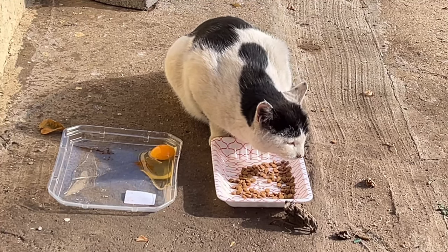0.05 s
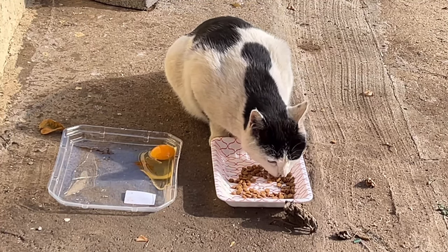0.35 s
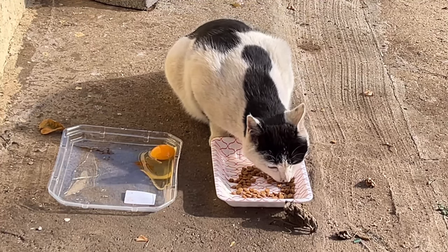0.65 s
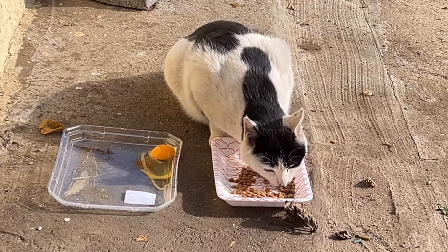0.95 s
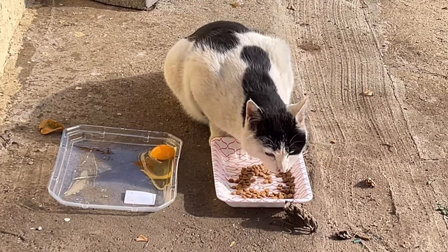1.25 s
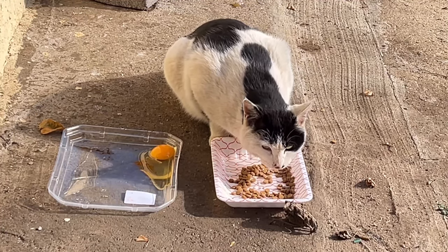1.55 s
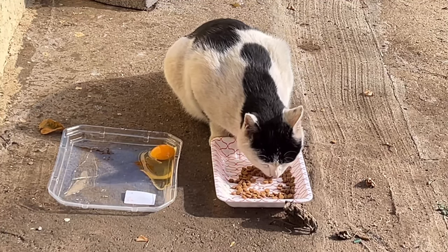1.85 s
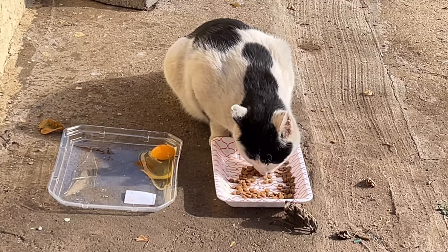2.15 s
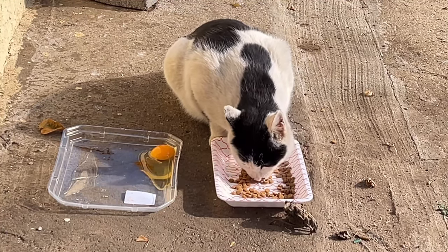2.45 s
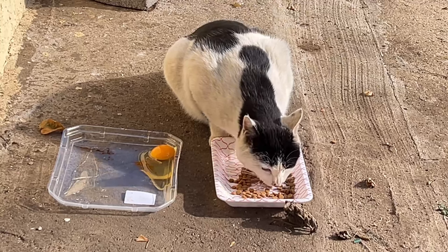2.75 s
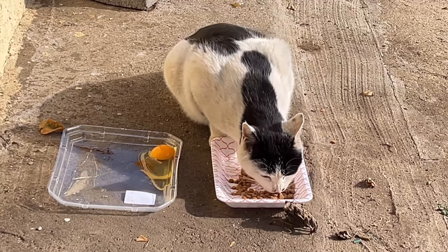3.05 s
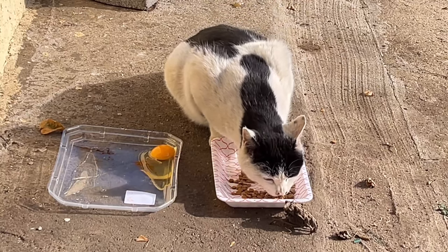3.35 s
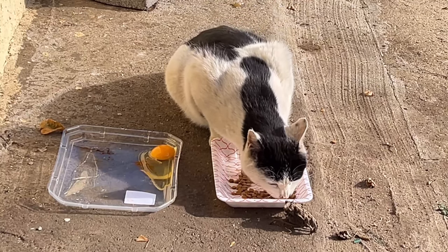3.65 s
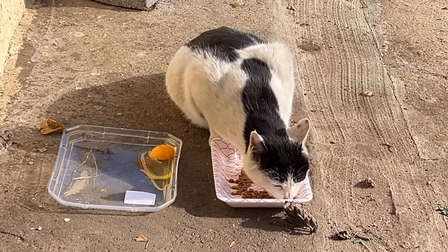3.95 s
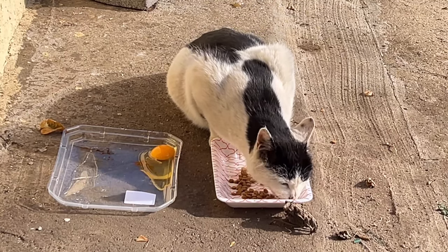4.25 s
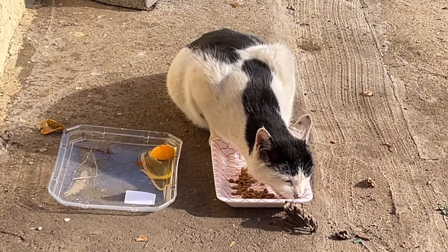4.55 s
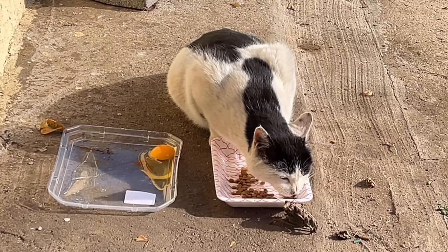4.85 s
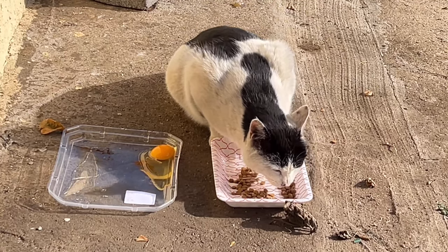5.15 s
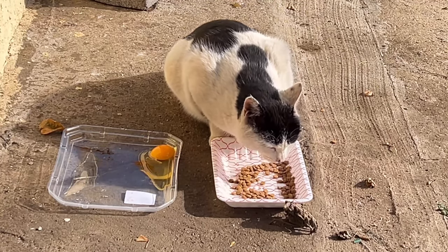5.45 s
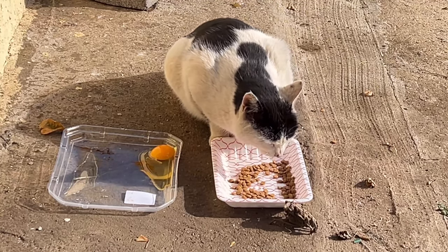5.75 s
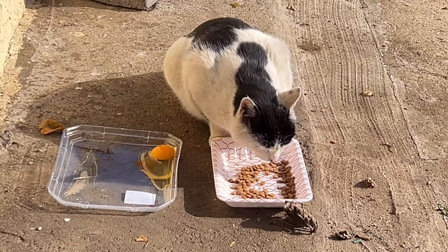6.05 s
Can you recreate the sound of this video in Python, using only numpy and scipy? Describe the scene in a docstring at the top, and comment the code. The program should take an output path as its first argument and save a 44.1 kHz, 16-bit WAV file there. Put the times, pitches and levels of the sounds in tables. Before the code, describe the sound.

A shoe scuffs on grit and wind bumps the microphone, then a cat quietly crunches dry food outdoors.

```python
"""A shoe scuffs on gritty concrete close by, clothing swishes and puffs of air bump the microphone.
Then a cat eats dry kibble from a foam tray in the quiet yard: pellets crack and crumble between its
teeth, and its tongue and lips smack. Early on a small bird whistles far off; distant traffic hums
under it all."""
import sys
import numpy as np
from scipy import signal
from scipy.fft import rfft, irfft, next_fast_len
from scipy.io import wavfile
from scipy.ndimage import uniform_filter1d, map_coordinates

SR = 44100
rng = np.random.default_rng(int(sys.argv[2]) if len(sys.argv) > 2 else 0)


def transcribe(signal):
    """Save signal, clipped to [-1, 1], as a 16-bit WAV file at the path in sys.argv[1]."""
    frames = np.atleast_2d(signal).T
    limited = np.clip(frames, -1, 1)
    pcm = np.round(limited * 32767).astype(np.int16)
    wavfile.write(sys.argv[1], SR, pcm)


N = 277999

# pellets cracking and ticking on the tray: start_s, level_db, pitch_hz, treble_db
BITES = [(1.953, -66, 6740, 20.5), (2.028, -48.5, 2860, -5), (2.297, -53, 1840, 3), (2.401, -43, 1800, 3.5),
         (2.41, -47.5, 4500, -16.5), (2.431, -39, 2940, -1), (2.447, -42, 2710, -34), (2.653, -57, 4480, 7),
         (2.663, -37, 4520, -5.5), (2.759, -47.5, 2730, -2), (2.781, -48, 2840, -6),
         (2.891, -43.5, 4400, -3), (2.902, -51, 4330, -7), (3.018, -50.5, 2740, 2), (3.032, -47.5, 2780, 2),
         (3.085, -49, 2900, 4), (3.175, -50, 2800, 2.5), (3.293, -53.5, 2580, -28),
         (3.327, -33, 2940, -16.5), (3.438, -52, 1810, -2), (3.568, -39.5, 2755, -8),
         (3.579, -48, 1860, -15), (3.739, -53, 2700, -21), (3.877, -66, 2690, 11), (4.041, -53.5, 2590, -2),
         (4.133, -49.5, 2600, -31), (4.156, -48, 2650, -19), (4.171, -45.5, 2670, -19),
         (4.272, -56.5, 1520, 2.5), (4.31, -52, 2620, -14), (4.382, -52.5, 2630, -4),
         (4.404, -52, 2750, -21), (4.421, -55.5, 2730, -18), (4.71, -38, 2050, -5.5),
         (4.713, -42.5, 1030, -18), (4.813, -56.5, 1550, -27), (5.054, -53, 2720, -31),
         (5.751, -44, 2600, 3.5)]
# jaw strokes that grind the crumbs: start_s, hold_s, level_db
CHEWS = [(2.01, 0.2, -76.5), (2.33, 0.13, -66.5), (2.635, 0.026, -58), (2.775, 0.02, -57.5),
         (2.905, 0.0055, -56), (3.05, 0.027, -61.5), (3.175, 0.016, -72.5), (3.39, .13, -67.5),
         (3.575, 0.02, -61), (3.745, 0.02, -64.5), (3.875, 0.02, -64), (4.0, 0.33, -77)]
# tone of the crumbs, and a bite's bright edge: frequency_hz, gain_db
CRUMB_EQ = [(800, -30), (1550, 4.5), (2150, -3), (2850, 1), (3700, -10), (4500, -4.5), (5300, -9),
            (7300, -10), (10000, -13.5), (15000, -23.5)]
SPLINTER_EQ = [(2500, -3.5), (4500, -5.5), (5000, -6.5), (6400, 1), (8800, -6.5), (15000, -13)]
# wet smacks of tongue and lips: start_s, hold_s, level_db, mouth_hz, lip_gain_db
SMACKS = [(4.565, 0.018, -64.5, 2540, -5.5), (4.643, 0.028, -65.5, 2750, -8.5),
          (4.959, 0.025, -71, 1900, 0), (5.354, 0.015, -64.5, 1920, -4.5),
          (5.655, 0.0028, -68.5, 2200, 10.5), (6.243, 0.018, -73.5, 2620, -23)]
# drags of the sole and swishes of a sleeve: start_s, hold_s, grind_db, hiss_db
SCUFFS = [(0.01, 0.12, -59, -57.5), (0.34, 0.066, -62.5, -58), (0.599, 0.031, -53.5, -63.5),
          (0.668, 0.02, -54, -68), (0.726, 0.042, -45, -63), (0.799, 0.064, -46, -55),
          (0.885, 0.16, -77, -56.5), (1.08, 0.013, -82, -67), (1.372, 0.0077, -60.5, -67.5),
          (1.494, 0.047, -73, -74.5), (1.745, 0.068, -75, -75.5), (1.93, 0.16, -65.5, -76),
          (6.084, 0.079, -77.5, -73)]
# grit snapping underfoot: start_s, level_db, pitch_hz, treble_db
GRIT = [(0.018, -44, 2030, 7), (0.205, -43, 2780, -27), (0.251, -39.5, 1530, -17), (0.597, -36, 1720, -30),
        (0.677, -47.5, 1880, -21), (0.746, -31, 1840, -22), (0.77, -29.5, 1850, -22),
        (0.795, -33.5, 2420, -5.5), (0.816, -33, 2650, -16), (0.835, -36.5, 2060, 1),
        (0.857, -35.5, 2170, 1), (0.943, -37, 1480, -9), (0.98, -41.5, 1900, -23), (1.097, -31.5, 1820, -8),
        (1.101, -26.5, 1450, -3), (1.185, -38, 1970, -58), (1.377, -38.5, 2140, -7),
        (1.381, -42.5, 2110, -20)]
# tone of grinding sand, and of sliding sand and fabric: frequency_hz, gain_db
GRIND_EQ = [(260, -51.5), (470, -15), (650, -0.5), (760, -3), (1050, 0), (1230, -7), (1700, -4), (2650, -8),
            (3150, -13), (3580, -14.5), (4100, -17.5), (6000, -27), (13000, -53)]
HISS_EQ = [(2000, 1), (5700, -1), (6600, 3.5), (7500, 1.5), (8400, 3.5), (9400, 2.5), (11000, 3),
           (15500, -8.5)]
# dull knocks of the sole landing: start_s, level_db
STEPS = [(1.099, -35.5), (1.381, -40)]
# gusts on the microphone: start_s, hold_s, buffet_db, flutter_db
GUSTS = [(0.1, 0.056, -40, -41), (0.195, 0.057, -38.5, -41.5), (0.323, 0.055, -38.5, -39.5),
         (0.42, 0.031, -34, -38.5), (0.585, 0.032, -36, -36.5), (.63, 0.035, -39.5, -49),
         (0.768, 0.2, -43.5, -43.5), (1.019, 0.11, -39.5, -49), (1.291, 0.12, -41.5, -56.5),
         (1.5, 0.1, -46.5, -62), (3.8, 0.15, -55, -65), (4.15, 0.19, -51, -76), (4.532, 0.23, -39, -65.5),
         (4.761, 0.73, -52, -74), (5.625, 0.13, -33, -61)]
# single puffs: peak_s, level_db, pitch_hz
PUFFS = [(0.091, -25, 99), (0.124, -20, 69), (0.115, -25.5, 248), (0.153, -23.5, 196), (0.189, -29.5, 294),
         (0.236, -27, 156), (0.34, -24, 100), (0.35, -38, 240), (0.386, -32, 113), (0.42, -22.5, 236),
         (0.432, -27, 163), (0.445, -24, 123), (.586, -23.5, 350), (0.591, -19.5, 120), (0.599, -23.5, 173),
         (.636, -32, 149), (1.028, -32.5, 130), (1.054, -37, 85), (1.319, -33, 65.5), (1.385, -29.5, 123),
         (1.531, -36, 81), (3.935, -38, 80), (4.141, -35.5, 64), (4.544, -30, 67), (4.647, -34, 177),
         (4.658, -27.5, 67), (4.975, -25.5, 71), (5.022, -23.5, 67), (5.073, -34.5, 59.5), (5.353, -32, 80),
         (5.465, -30.5, 67.7), (5.557, -18, 112), (5.573, -22.5, 217), (5.58, -15, 95), (5.643, -20, 119),
         (5.69, -26, 136), (5.739, -24, 93.6), (5.765, -23.5, 101)]
# tone of the deep buffet, and of the small, fast eddies: frequency_hz, gain_db
BUFFET_EQ = [(25, -15), (52, 4.5), (70, 9), (110, -3), (160, -15), (400, -71.5)]
FLUTTER_EQ = [(70, -26), (130, 5), (240, 3.5), (380, -3), (550, -14.5), (680, -22), (900, -24), (2000, -69)]
# bird calls: start_s, length_s, from_hz, to_hz, level_db
CHIRPS = [(.255, .07, 4490, 4400, -72.5), (.425, .075, 4130, 4240, -73), (.66, .06, 4520, 4660, -73),
          (1.21, .05, 4900, 5250, -80), (1.672, .08, 4380, 5020, -78.5)]
# the traffic's fader: time_s, gain_db
TRAFFIC_FADER = [(0, -59.5), (2.2, -65.5), (2.8, -60.5), (3.5, -64.5), (6.3, -66.5)]
# drones in the traffic: pitch_hz, half_width_hz, gain_db
DRONES = [(178.4, 16.3, -3), (733, 13, -13), (1111, 37, -14.5)]
# tone of its murmur and its rumble: frequency_hz, gain_db
MURMUR_EQ = [(90, -22), (160, 4), (260, 1.5), (450, -2.5), (800, -8), (1200, -10), (1800, -12.5),
             (2600, -18), (3400, -26), (5600, -29), (7300, -25.5), (11000, -30.5), (15500, -27)]
RUMBLE_EQ = [(25, -15), (65, -1), (110, -8.5), (400, -60)]
# stereo spread overall, and of the scuffs: frequency_hz, side_minus_mid_db
WIDTH = [(60, -7), (300, -10.5), (800, -1), (2200, -24.5), (4400, -11), (6000, -48), (13000, -28)]
SHOE_WIDTH = [(400, 9), (800, 1), (1300, 5.5), (2400, -24), (4400, -9), (6000, -46)]
# the yard's reverb time: frequency_hz, t60_s
YARD_DECAY = [(300, 0.19), (2500, 0.19), (8000, 0.25), (15000, 0.22)]
# how far the right microphone port trails the left: frequency_hz, lag_rad
PORT_LAG = [(5000, 0), (8600, .5), (10400, 2.9), (11500, 3.3), (13600, 5.6)]

JAW_SLOPES, SCUFF_SLOPES, GUST_SLOPES = (691, 315), (363, 203), (494, 378)  # rise_db_per_s, fall_db_per_s


def cat():
    """Each bite snaps a pellet, and the jaw grinds the crumbs."""
    bites = snaps(BITES, CRUMB_EQ, SPLINTER_EQ, attack_s=0.00034, hard_db=-32, step_db=-13, tone=0.7,
                  body_db=-10, treble_db=-7.5, crumble_db=-22.5, crumble_t60_s=0.064, ring_db=5)
    cracks = crackle(per_s=700, spread_db=5, bed_db=-7)
    crumbs = swells(CHEWS, *JAW_SLOPES) * coloured(cracks, CRUMB_EQ)
    return stereo(walls(bites + crumbs, wet_db=-9), WIDTH)


def smacks():
    """Tongue and lips part and ring the mouth's two resonances."""
    track = np.zeros((2, N))
    for s, hold, db, mouth_hz, lip_db in SMACKS:
        mouth = rasp(hold, mouth_hz, q=2.05)
        lips = amp(lip_db) * rasp(hold, hz=6220, q=2.05)
        add(track, s, amp(db) * (mouth + lips))
    return stereo(walls(track, wet_db=-8), WIDTH)


def shoe():
    """A sole drags over sand: fine grains grind, and the coarse ones snap."""
    drag = swells([(s, hold, db) for s, hold, db, _ in SCUFFS], *SCUFF_SLOPES)
    sand = crackle(per_s=800, spread_db=4.5, bed_db=-7)
    grind = drag * coloured(sand, GRIND_EQ)
    grit = snaps(GRIT, GRIND_EQ, HISS_EQ, attack_s=0.00075, hard_db=-29, step_db=-8, tone=0.3,
                 body_db=-1.5, treble_db=-6, crumble_db=-19, crumble_t60_s=0.03, ring_db=-6)
    return stereo(walls(amp(3) * grit, wet_db=-6) + grind, SHOE_WIDTH)


def sole(knock_hz=624, t60_s=0.086):
    """The sole rasps over a trapped stone, and knocks when it is set down."""
    track, t = np.zeros((2, N)), np.arange(SR // 8) / SR
    add(track, 0.08, amp(-48) * rasp(hold_s=0.038, hz=2230, q=2.8))
    for s, db in STEPS:
        knock = np.sin(2 * np.pi * (knock_hz * t + rng.random((2, 1))))
        add(track, s, amp(db - 60 * t / t60_s) * knock)
    return stereo(track, WIDTH)


def swish():
    """Sand and fabric slide with a fine hiss."""
    slide = swells([(s, hold, db) for s, hold, _, db in SCUFFS], *SCUFF_SLOPES)
    hiss = coloured(crackle(per_s=2000, spread_db=4, bed_db=3), HISS_EQ)
    return stereo(slide * hiss, SHOE_WIDTH)


def wind(wobble_hz=30):
    """Gusts and a dying breeze rumble on the microphone, with hard puffs on top."""
    buffet = swells([(s, hold, db) for s, hold, db, _ in GUSTS], *GUST_SLOPES)
    flutter = swells([(s, hold, db) for s, hold, _, db in GUSTS], *GUST_SLOPES)
    breeze = amp(-41 - 10 * np.arange(N) / SR)
    air = np.hypot(buffet, breeze) * eddies(BUFFET_EQ)
    air += np.hypot(flutter, amp(-5.5) * breeze) * eddies(FLUTTER_EQ)
    thumps = puffs()
    lumps = rng.standard_normal(N * wobble_hz // SR + 4)
    wobble_db = 2.2 * map_coordinates(lumps, [np.arange(N) * wobble_hz / SR])
    return stereo(air * amp(wobble_db), WIDTH) + thumps


def eddies(eq):
    """Turbulent pressure, its level evened out over about 30 ms."""
    pressure = coloured(rng.standard_normal((2, N)), eq)
    power = np.abs(uniform_filter1d(pressure ** 2, 1300, axis=1))
    return pressure / np.sqrt(power + 0.00035)


def puffs():
    """A hard puff swings the pressure for a cycle or two."""
    track, t = np.zeros(N), np.arange(-SR // 20, SR // 20) / SR
    nepers_per_cycle = np.where(t < 0, 5.77, 1.88)  # fast attack, slower release
    for s, db, hz in PUFFS:
        swing = np.sin(2 * np.pi * (hz * t + rng.random()))
        add(track, s + t[0], amp(db) * swing / np.cosh(nepers_per_cycle * hz * t))
    return track


def bird():
    """Thin gliding whistles, blurred by distance."""
    song = np.zeros((2, N))
    for s, length, from_hz, to_hz, db in CHIRPS:
        hz = np.linspace(from_hz, to_hz, int(length * SR))
        quiver = 1 + 0.1 * rng.standard_normal(len(hz))
        whistle = np.sin(2 * np.pi * np.cumsum(hz * quiver) / SR)
        add(song, s, amp(db) * signal.windows.tukey(len(hz)) * whistle)
    return walls(song, wet_db=-4)


def traffic():
    """A bed of distant traffic fades, swelling once: broad murmur, low rumble and a few drones."""
    fader_db = np.interp(np.arange(N) / SR, *np.transpose(TRAFFIC_FADER))
    murmur = amp(-2.5) * coloured(rng.standard_normal((2, N)), MURMUR_EQ)
    rumble = amp(3.5) * coloured(rng.standard_normal((2, N)), RUMBLE_EQ)
    peaks = lambda f: sum(amp(db) / (1 + ((f - hz) / width) ** 2) for hz, width, db in DRONES)
    drones = amp(-7.5) * unit(filtered(rng.standard_normal((2, N)), peaks))
    return stereo(amp(fader_db) * (murmur + rumble + drones), WIDTH)


def walls(x, wet_db):
    """The ground and the yard's walls return a short diffuse tail."""
    hz, t, noise = signal.stft(rng.standard_normal((2, SR // 4)), SR, nperseg=256)
    decay = amp(-60 * t / along(YARD_DECAY, hz)[:, None])
    tail = signal.istft(noise * decay, SR, nperseg=256)[1]
    return x + amp(wet_db) * signal.fftconvolve(x, tail / np.linalg.norm(tail[0]), axes=1)[:, :N]


def snaps(rows, body_eq, treble_eq, attack_s, hard_db, step_db, tone,
          body_db, treble_db, crumble_db, crumble_t60_s, ring_db):
    """A brittle piece rings for an instant as it breaks; its fragments follow near the same pitch."""
    track, t = np.zeros((2, N)), np.arange(SR // 10) / SR
    noise = lambda: rng.standard_normal((2, len(t)))
    for s, db, hz, bright_db in rows:
        # three cracks in a row: hard pieces snap at once, weak ones give way slowly, in steps
        softness = np.clip((hard_db - db) / 16, 0, 1)
        cracks_s = np.array([[0], [rng.uniform(0.0011, 0.00376)], [rng.uniform(0.004, 0.0089)]])
        age = np.maximum(t - cracks_s, 0) / (attack_s * (1 + softness))
        crack_gains = amp(step_db * (1 - 0.5 * softness) * np.arange(3))
        envelope = crack_gains @ (age ** 2 * np.exp(-2 * age))
        ring = unit(envelope * np.sin(2 * np.pi * (hz * t + rng.random((2, 1)))))
        snap = tone * ring + amp(body_db) * coloured(envelope * noise(), body_eq)
        snap += amp(treble_db + bright_db) * coloured(envelope * noise(), treble_eq)
        snap *= 6 / np.linalg.norm(snap, axis=1, keepdims=True)
        spikes = noise() ** 3  # cubing turns hiss into ticks
        resonance = lambda f: 1 / (1 + (3 * np.log(f / hz + 1e-6)) ** 2)
        dust = amp(bright_db + 9.5) * coloured(noise(), treble_eq)
        fragments = coloured(spikes, body_eq) + amp(ring_db) * unit(filtered(spikes, resonance)) + dust
        crumble = amp(crumble_db - 60 * t / crumble_t60_s) * (1 - np.exp(-t / attack_s))
        add(track, s, amp(db) * (snap + crumble * fragments))
    return track


def crackle(per_s, spread_db, bed_db):
    """Tiny dry fractures, each a click of its own size, over a bed of finer ones."""
    breaks = rng.random(N) < per_s / SR
    sizes = amp(spread_db * np.clip(rng.standard_normal(N), -2, 2))
    clicks = breaks * sizes * np.sign(rng.standard_normal((2, N)))
    return unit(clicks) + amp(bed_db) * rng.standard_normal((2, N))


def rasp(hold_s, hz, q, attack_s=0.0054, release_s=0.0067):
    """A short run of uneven clicks rings one resonance."""
    t = np.arange(SR // 8) / SR
    clicks = rng.standard_normal((2, len(t))) ** 3
    ring = unit(filtered(clicks, lambda f: 1 / (1 + 1j * q * (f / hz - hz / (f + 1))) ** 2))
    return ring * np.minimum(t / attack_s, 1) * np.exp(-np.maximum(t - hold_s, 0) / release_s)


def swells(events, rise_db_per_s, fall_db_per_s):
    """Gain envelope: each event is fully up at its start, holds and dies away."""
    t = np.arange(N) / SR
    level_db = np.full(N, -120.)
    for s, hold, db in events:
        below_db = np.maximum(rise_db_per_s * (s - t), fall_db_per_s * (t - s - hold))
        level_db = np.maximum(level_db, db - np.maximum(below_db, 0))
    return amp(level_db)


def coloured(x, eq):
    """Ring x through a body with this EQ curve (minimum phase), at rms 1."""
    def response(hz):
        cepstrum = irfft(np.log(amp(along(eq, hz))))
        k = np.arange(len(cepstrum))
        causal_fold = 1 + np.sign(k) * np.sign(len(k) / 2 - k)
        return np.exp(rfft(cepstrum * causal_fold))
    return unit(filtered(x, response))


def stereo(pair, width):
    """Two unrelated signals as mid and side."""
    side = filtered(pair[1], lambda hz: amp(along(width, hz)))
    return np.array([pair[0] + side, pair[0] - side])


def filtered(x, response):
    """Apply a frequency response."""
    n = x.shape[-1]
    padded = next_fast_len(n + 2048)
    return irfft(rfft(x, padded) * response(np.fft.rfftfreq(padded, 1 / SR)), padded)[..., :n]


def along(points, hz):
    """Read a curve on a log frequency axis."""
    knots_hz, values = np.transpose(points)
    return np.interp(np.log(hz + 1), np.log(knots_hz + 1), values)


def add(track, s, sound):
    """Mix a sound in at s seconds."""
    start = int(np.clip(round(s * SR), 0, N - 1))
    part = sound[..., :N - start]
    track[..., start:start + part.shape[-1]] += part


def amp(db):
    """Decibels to gain."""
    return 10 ** (np.asarray(db) / 20)


def unit(x):
    """Scale to rms 1."""
    return x / np.sqrt(np.mean(x ** 2) + 1e-20)


def scene():
    """The mix at the microphone."""
    return cat() + smacks() + shoe() + sole() + swish() + wind() + bird() + traffic()


def record(dry):
    """The two microphone ports fall out of phase in the high treble; sub-bass and the top are cut."""
    low_cut_hz, top_hz = 33, 15850
    right = filtered(dry[1], lambda hz: np.exp(-1j * along(PORT_LAG, hz)))
    passband = lambda hz: hz ** 4 / (hz ** 4 + low_cut_hz ** 4) * (hz < top_hz)
    return filtered(np.array([dry[0], right]), passband)


dry = scene()
out = record(dry)
transcribe(out)
```